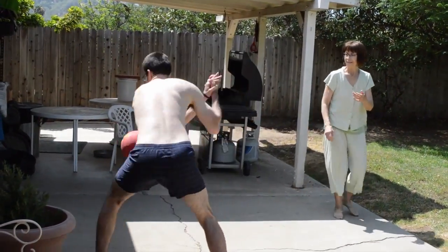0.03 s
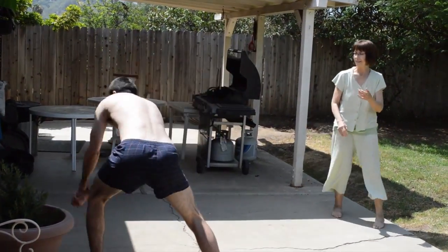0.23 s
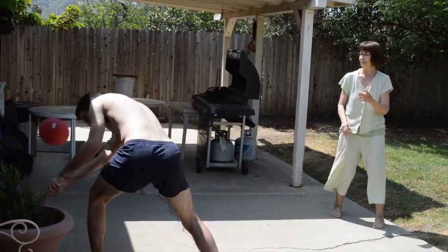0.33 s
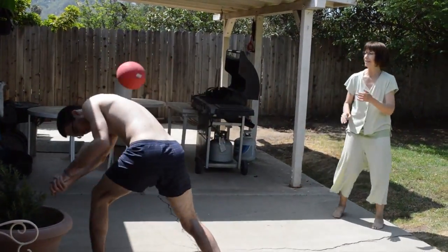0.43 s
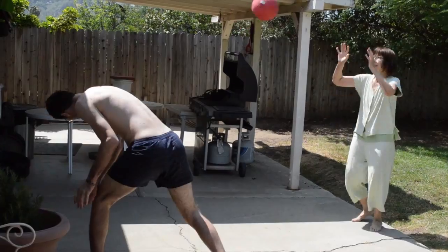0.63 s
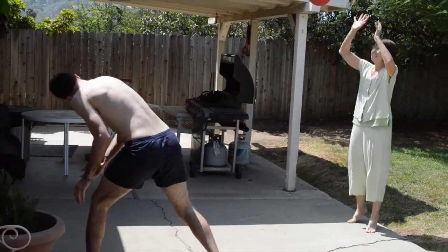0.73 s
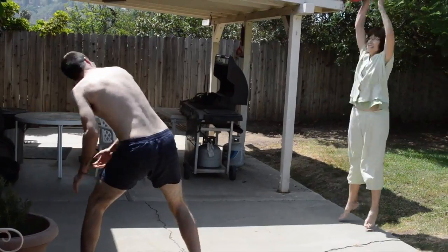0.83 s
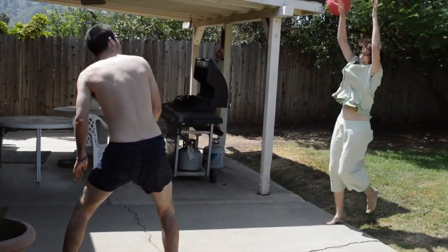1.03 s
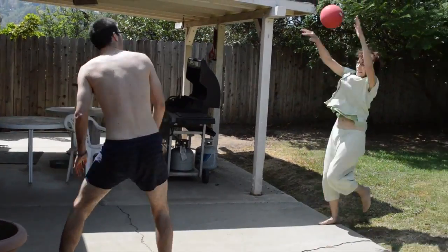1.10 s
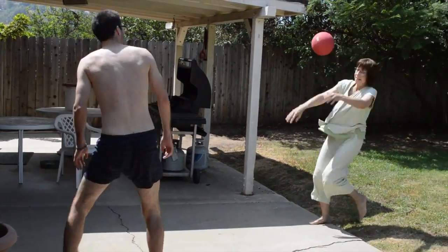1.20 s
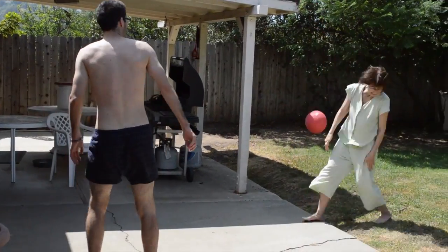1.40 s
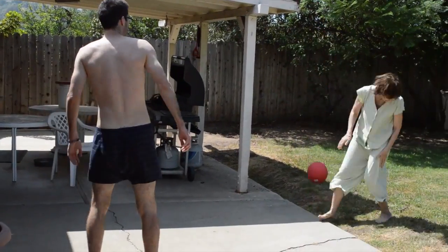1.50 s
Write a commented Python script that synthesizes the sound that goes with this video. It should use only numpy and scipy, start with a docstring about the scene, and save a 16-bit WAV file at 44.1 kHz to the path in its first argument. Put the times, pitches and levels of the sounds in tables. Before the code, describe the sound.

A rubber ball is slapped and bounced on concrete in a rapid cluster of loud, clipped cracks, then hit once more with a hollow ping; bare feet scuff and faint birds chirp in an open backyard.

```python
"""A rubber ball is slapped and bounced hard on a concrete patio under a roof, overloading the microphone.
Each hit is a burst of shaped noise (the crack), fading tones (thud and shell) and a ping of the air inside.
Patio and yard echo the crack and thump. Bare feet scuff as short swells of hiss, birds chirp as gliding tones.
Distant traffic is shaped noise, and a thin electronic whine is one steady high tone."""
import sys
import numpy as np
from scipy import signal
from scipy.fft import rfft, irfft, next_fast_len
from scipy.io import wavfile
from scipy.ndimage import uniform_filter1d

SR = 44100
rng = np.random.default_rng(int(sys.argv[2]) if len(sys.argv) > 2 else 0)


def put_to_file(sound):
    """Save the sound as 16-bit audio at rate SR, in the file named by the first command-line argument."""
    columns = np.atleast_2d(sound).T  # one column per channel
    safe = np.clip(columns, -1, 1)
    whole_steps = np.round(safe * 32767)
    wavfile.write(sys.argv[1], SR, whole_steps.astype(np.int16))


N = 68355  # length of the scene in samples

# How long the yard's echo lasts at each pitch. Each row: frequency in Hz, time to fade by 60 dB in seconds.
YARD_FADE = [(100, 0.8622), (260, 0.21323), (700, 0.3993), (1840, 0.59706), (4850, 0.45146),
             (12800, 0.28688)]
YARD_DELAY_S = 0.012


def amp(db):
    """Turn decibels into a plain loudness factor."""
    return 10 ** (np.asarray(db) / 20)


def evened(x):
    """Scale a signal to an rms (average strength) of 1."""
    return x / np.sqrt(np.mean(x ** 2) + 1e-20)


def read(points, hz):
    """Read a curve of (Hz, value) points at any frequency, on a logarithmic pitch scale."""
    point_hz, value = np.transpose(points)
    return np.interp(np.log(hz + 1), np.log(point_hz + 1), value)


def add(mix, start_s, sound):
    """Add a sound to the mix at its start time, cutting off what runs past the end."""
    part = mix[round(start_s * SR):][:len(sound)]
    part += sound[:len(part)]


def played(rows, source):
    """Play one sound for each row of a table."""
    mix = np.zeros(N)
    for row in rows:
        add(mix, *source(*row))
    return mix


def coloured(length, shape_db):
    """Make noise of rms 1 with the spectrum shape_db(Hz)."""
    hz = np.fft.rfftfreq(length, 1 / SR)
    spectrum = rfft(rng.standard_normal(length))
    return evened(irfft(spectrum * amp(shape_db(hz)), length))


def lumps(length, size):
    """Make a slow random wander, about 1 in rms, by averaging noise over size samples."""
    return evened(uniform_filter1d(rng.standard_normal(length + 400), size))[:length]


def ring(modes, t, share=1):
    """Sum fading tones, one per way a body can vibrate; share stretches or shortens their fades."""
    return sum(amp(db - 60 * t / t60 / share) * np.sin(2 * np.pi * hz * t) for hz, db, t60 in modes)


def echo(x, decay, delay_s=0.002):
    """Add up scattered reflections as a noise tail, each band dying at its own speed."""
    hz, t, noise = signal.stft(rng.standard_normal(SR // 2), SR, nperseg=256)
    fade = amp(-60 * t / read(decay, hz)[:, None])
    tail = signal.istft(noise * fade, SR, nperseg=256)[1]
    tail = np.append(np.zeros(round(delay_s * SR)), tail / np.linalg.norm(tail))
    return signal.fftconvolve(x, tail)[:len(x)]


def traffic():
    """Distant wash: noise built in short overlapping frames, with drifting patches and a slow swell."""
    # Tone of the wash. Each row: frequency in Hz, relative level in dB.
    wash_colour = [(12, -57), (20, -21.5), (64, 0.5), (148, 2.5), (185, -11), (244, -5), (403, -15),
                   (563, -5), (612, -7.5), (1070, -5.5), (2200, -15.5), (3240, -22), (6150, -33),
                   (14200, -33), (15400, -44)]
    level_db, patch_db, swell_db = -35.5, 1.5, 0.4
    frames, hz = N // 256 + 5, np.fft.rfftfreq(1024, 1 / SR)
    real, imaginary, patches = rng.standard_normal((frames, 513, 3)).T
    patches = uniform_filter1d(patches, size=10, axis=0)  # blur across pitch
    patches = evened(uniform_filter1d(patches, size=12, axis=1))  # blur across time
    swell = evened(uniform_filter1d(rng.standard_normal(frames), size=30))
    frame_db = read(wash_colour, hz)[:, None] + patch_db * patches + swell_db * swell
    wash = signal.istft((real + 1j * imaginary) * amp(frame_db), nperseg=1024, noverlap=768)[1][:N]
    return amp(level_db) * evened(wash)


def chirp(start, length, from_hz, mid_hz, to_hz, db):
    """A far bird's whistle: one gliding tone, slightly unsteady in pitch and loudness."""
    waver, flutter_db = 0.02108, 3  # rms pitch wander as a share, rms loudness wander in dB
    u = np.arange(round(length * SR)) / (length * SR)  # runs from 0 to 1 through the chirp
    glide_hz = np.interp(u, [0, 0.5, 1], [from_hz, mid_hz, to_hz])
    hz = glide_hz * (1 + waver * lumps(len(u), size=150))
    swell = np.sin(np.pi * u) ** 0.5
    loudness = amp(db + flutter_db * lumps(len(u), size=200))
    return start, loudness * swell * np.sin(2 * np.pi * np.cumsum(hz) / SR)


def bird_chirps():
    """All the chirps, without echo."""
    # Each row: start in seconds, length in seconds, pitch at start, middle and end in Hz (before the waver),
    # level in dB (before the flutter).
    chirps = [(.54, 0.0693, 3780, 3840, 3697, -51), (.618, 0.03304, 5000, 6297, 6015, -46),
              (.635, 0.013, 3813, 4172, 4851, -44), (.648, 0.028, 4836, 4874, 4512, -40),
              (.645, 0.07122, 3900, 3770, 3820, -42.5), (.705, 0.043726, 2861, 3290, 3132, -38),
              (1.04, 0.0393, 5596, 5670, 5437, -47.5), (1.16, 0.02114, 3950, 3950, 3710, -52.5),
              (1.26, 0.0624, 5300, 5100, 5185, -58)]
    return played(chirps, chirp)


def scuff(start, length, peak, db, centre_hz, octaves):
    """A bare sole drags over grit: a short, uneven swell of hiss around one pitch."""
    grit_db = 1.5
    u = np.arange(round(length * SR)) / (length * SR)  # runs from 0 to 1 through the scuff
    hiss = coloured(len(u), lambda hz: -12 * (np.log2((hz + 100) / centre_hz) / octaves) ** 2)
    swell = np.interp(u, [0, np.clip(peak, 0.02, 0.95), 1], [0, 1, 0])
    return start, hiss * swell * amp(db + grit_db * lumps(len(u), size=60))


def foot_scuffs():
    """All the scuffs of bare feet, without echo."""
    # Each row: start in seconds, length in seconds, loudest moment as a share of the length,
    # level in dB (before swell and grit), centre pitch in Hz, distance in octaves where the hiss is 12 dB down.
    scuffs = [(.16, 0.0265, 0.3986, -55, 8000, 0.794), (.59, 0.13295, 0.3972, -45, 9864, 0.7705),
              (.64, 0.0563, 0.402, -50, 9250, 1.014), (.685, 0.054, 0.6363, -43.5, 8715, 1.325),
              (.775, 0.01373, 0.491, -56.5, 10100, 0.598), (.832, 0.0205, 0.46, -63.5, 10000, 0.4176),
              (.966, 0.0089, 0.498, -39, 10020, 0.3594), (.98, 0.00962, 0.492, -31, 8285, 1.483),
              (1.075, 0.02302, 0.3443, -44, 7515, 1.098), (1.158, 0.0415, 0.1457, -44.5, 6019, 0.978),
              (1.206, 0.04537, 0.1002, -41.5, 8717, 0.9725), (1.355, 0.04986, 0.163, -37.5, 5556, 2.519),
              (1.422, 0.06608, 0.2937, -35.5, 9556, 0.951), (1.527, 0.01203, 0.202, -45.5, 7000, 1.233)]
    return played(scuffs, scuff)


def air_ping(t, ping_db, upper_db):
    """The air inside the ball rings; each tone has a close partner, so the two beat together."""
    # Each row: frequency in Hz, relative level in dB, time to fade by 60 dB in seconds.
    air_tones = [(1065.3, -1.5, 0.5848), (1704.6, -1, 0.8113), (2267, -16, 0.748), (2880, 4.5, 0.1),
                 (3857, -39, 0.246)]
    split_hz, partner_life = 8, 0.6  # the partner is higher, equally loud at first, and fades sooner
    pairs = [[(hz, db, t60), (hz + split_hz, db, partner_life * t60)] for hz, db, t60 in air_tones]
    first = amp(ping_db) * ring(pairs[0], t)
    return first + amp(upper_db) * sum(ring(pair, t) for pair in pairs[1:])


def shell_thump(t, thud_db, shell_db, upper_shell_db, share):
    """The struck ball thumps: a low thud and two groups of shell tones, all fading."""
    # Low thud. Each row: frequency in Hz, relative level in dB, time to fade by 60 dB in seconds.
    thud_tones = [(62.74, -7, 0.0893), (131.09, 0.5, 0.0585)]
    # Main shell tones. Each row: frequency in Hz, relative level in dB,
    # time to fade by 60 dB in seconds (before share stretches it).
    shell_tones = [(214.34, -8, 0.07755), (250.4, -6, 0.06394), (286.5, 0, 0.12145),
                   (325.05, -13.5, 0.0911)]
    # Higher shell tones. Each row: frequency in Hz, relative level in dB, time to fade by 60 dB in seconds.
    upper_tones = [(512.94, 1.5, 0.04368), (601.87, -5, 0.06302), (712.94, -10.5, 0.06331),
                   (840.3, -13, 0.01333)]
    thud = amp(thud_db) * ring(thud_tones, t)
    shell = amp(shell_db) * ring(shell_tones, t, share)
    return thud + shell + amp(upper_shell_db) * ring(upper_tones, t)


def hit(start, contact, crack_db, hold, dull_db, band_hz, lift_db, thud_db, shell_db, upper_shell_db, share,
        ping_db, upper_db, patio_db, yard_db):
    """A clumpy crack and the thump of the shell, both echoed, and the unechoed ping of the air inside."""
    # Basic tone of the crack. Each row: frequency in Hz, relative level in dB.
    crack_colour = [(180, -18.5), (300, -1), (2340, -5.5), (3900, -4), (5260, -9), (5800, -8.5),
                    (8490, -10), (10400, -8.5), (15700, -22)]
    # How long the patio's echo lasts. Each row: frequency in Hz, time to fade by 60 dB in seconds.
    patio_fade = [(100, 0.11988), (1000, 0.1653), (10000, 0.10908)]
    crack_t60, clump_db, lift_octaves = 0.02059, 3.5, 0.5672  # fade in seconds, unevenness, width of lift
    t = np.arange(SR // 2) / SR
    rise = np.minimum(t / max(contact, 1 / SR), 1)

    def colour(hz):
        tilt = dull_db * np.log2((hz + 100) / 2000)
        lift = lift_db * np.exp(-(np.log2((hz + 1) / band_hz) / lift_octaves) ** 2)
        return read(crack_colour, hz) + tilt + lift

    crack = coloured(len(t), colour) * amp(clump_db * lumps(len(t), size=16))
    crack /= np.std(crack[:round((contact + hold) * SR) + 100])
    crack *= rise * amp(crack_db - 60 * np.maximum(t - contact - hold, 0) / crack_t60)
    # The echoes are fed a short click with the crack's colour and energy, giving a smooth tail.
    click = irfft(amp(colour(np.fft.rfftfreq(len(t), 1 / SR))), len(t))
    click = np.roll(click, SR // 500)  # 2 ms later
    click *= np.linalg.norm(crack) / np.linalg.norm(click) * (t < 0.01)
    body = rise * shell_thump(t, thud_db, shell_db, upper_shell_db, share)
    air = rise * air_ping(t, ping_db, upper_db)
    thrown = click + body
    patio_echo = amp(patio_db) * echo(thrown, patio_fade)
    yard_echo = amp(yard_db) * echo(thrown, YARD_FADE, YARD_DELAY_S)
    return start, crack + body + air + patio_echo + yard_echo


def ball():
    """All slaps and bounces of the ball, with two small distinct echoes, each with its own rise time."""
    # The rows at 0.249 and 0.341 seconds are the small echoes, made the same way as the hits.
    # Each row: start in seconds, rise time in seconds, crack level in dB, crack hold in seconds,
    # tilt of the crack's tone in dB per octave (above 0 favours treble), centre of the altered band in Hz,
    # its lift in dB (below 0 is a dip), thud level, shell level and upper shell level in dB,
    # factor on the shell's fade time, first ping level, upper pings level, patio echo level
    # and yard echo level in dB.
    hits = [(.2052, 0.0002505, -4, 0.0023805, 1.6276, 1997, 10, -9, -13, -16, 0.7727, -33.5, -32, -7, -20.5),
            (.2293, 0.0033, -25.5, 0.00294, 0, 600, 3, -44, -4, -23.5, 0.6101, -62, -58.5, -13, -30),
            (.2490, 0.001051, -31.5, 0.001618, 6, 9510, -8.5, -52.5, -29.5, -43.5, 1.734, -36, -41.5, 5, -24.5),
            (.2698, 0.0003684, -7, .005, -0.5, 676.4, -3, -15, -7, -9.5, 0.5213, -28.5, -30, -4, -4),
            (.3128, 0.0012405, -5, 0.00341, 0, 7755, 3.5, -28.5, -11, -25, 1.7474, -28.5, -27.5, -5.5, -7.5),
            (.341, 0.010296, -17.5, 0.00785, -2.5, 1143, 3, -44.5, -17, -39.5, 0.499, -34.5, -28, -11.5, -1.5),
            (.8663, 0.001528, -13.5, 0.010589, 0.528, 9980, 2.5, -21, -18, -14, 1.8095, -18, -38, -7, -6.5)]
    return played(hits, hit)


def scene():
    """Mix traffic, ball, feet and birds into one channel, with yard echoes behind feet and birds."""
    feet, birds = foot_scuffs(), bird_chirps()
    feet = feet + amp(-10.5) * echo(feet, YARD_FADE, YARD_DELAY_S)
    birds = birds + amp(-3.5) * echo(birds, YARD_FADE, YARD_DELAY_S)
    return (traffic() + ball() + feet + birds)[None]


def record(dry):
    """Microphone colour, a thin electronic whine, hard overload of loud peaks, then the band limit."""
    # Tone of the microphone. Each row: frequency in Hz, level change in dB.
    mic_colour = [(2000, -0.5), (6000, 0.5), (10000, 2), (12500, -4.5), (15800, -10.5)]
    bass_cut_hz, edge_hz, clip_level = 51.8, 15850, 1.0
    whine_hz, whine_db = 15676, -62.5  # rms level before the band limit
    size = next_fast_len(N + 4096)
    gain = amp(read(mic_colour, np.fft.rfftfreq(size, 1 / SR)))
    heard = irfft(rfft(dry, size) * gain, size)[:, :N]
    heard = signal.sosfilt(signal.butter(2, bass_cut_hz, "high", fs=SR, output="sos"), heard)
    whine = amp(whine_db) * np.sqrt(2) * np.sin(2 * np.pi * whine_hz * np.arange(N) / SR)
    clipped = np.clip(heard + whine, -clip_level, clip_level)
    band_limit = signal.firwin(511, edge_hz, window=("kaiser", 9), fs=SR)
    return signal.oaconvolve(clipped, band_limit[None], "same")


dry = scene()
out = record(dry)
put_to_file(out)
```